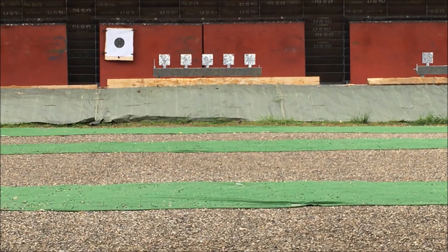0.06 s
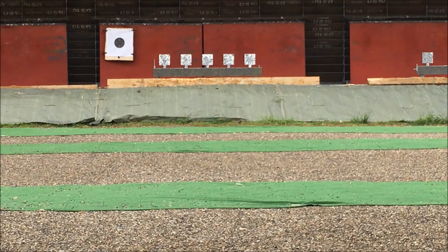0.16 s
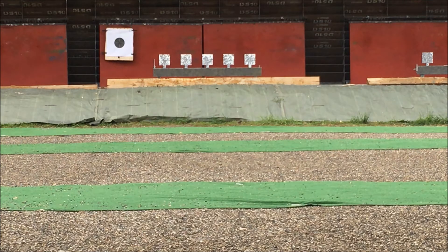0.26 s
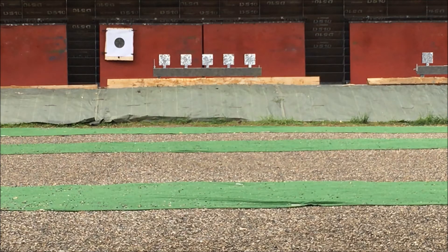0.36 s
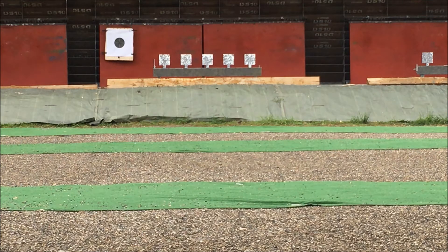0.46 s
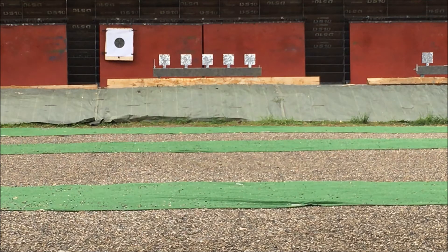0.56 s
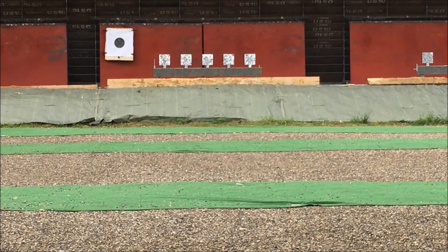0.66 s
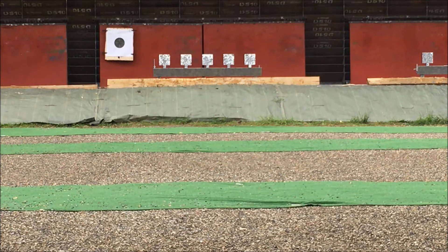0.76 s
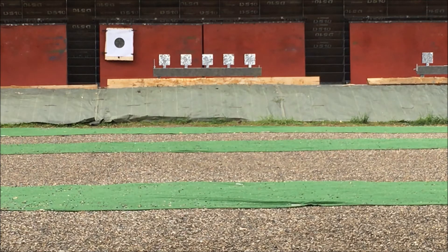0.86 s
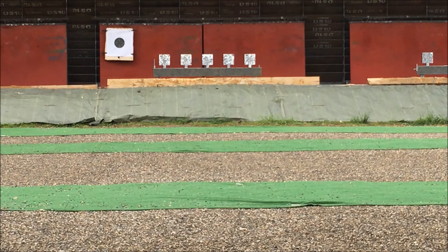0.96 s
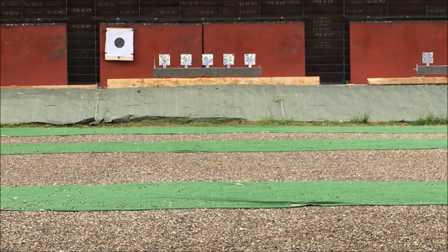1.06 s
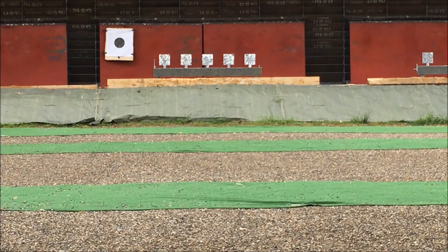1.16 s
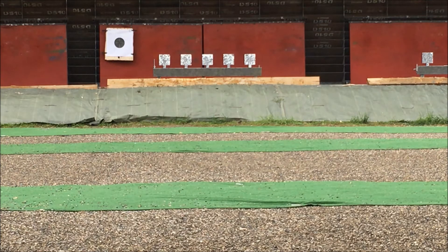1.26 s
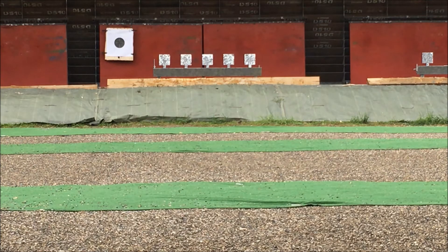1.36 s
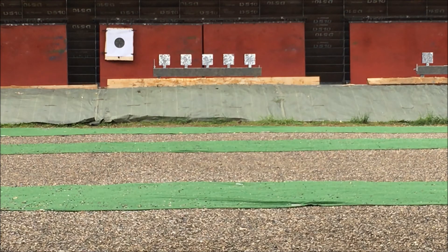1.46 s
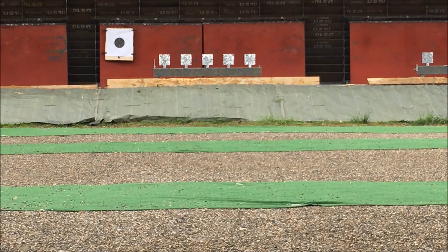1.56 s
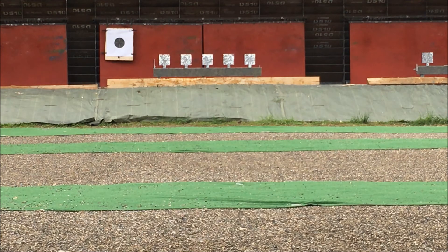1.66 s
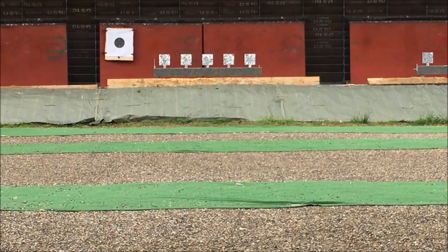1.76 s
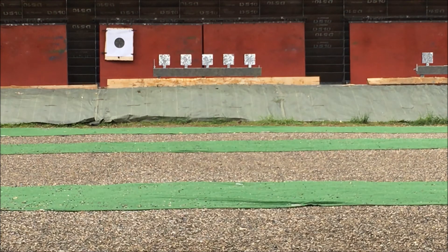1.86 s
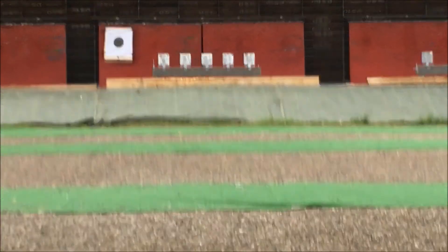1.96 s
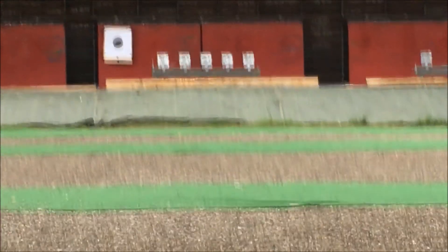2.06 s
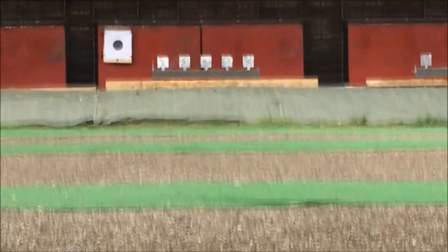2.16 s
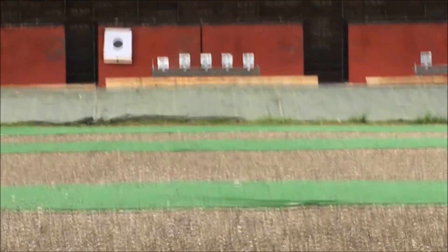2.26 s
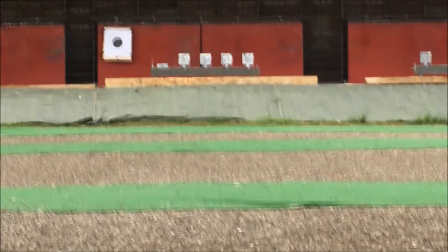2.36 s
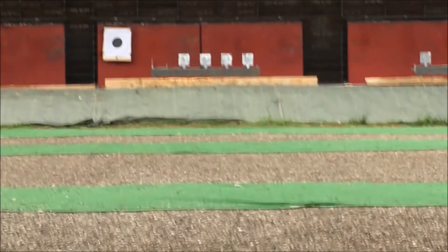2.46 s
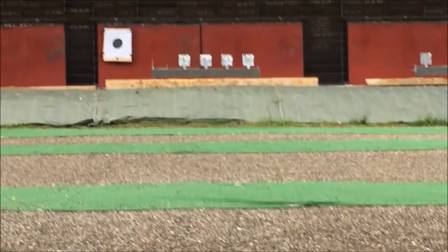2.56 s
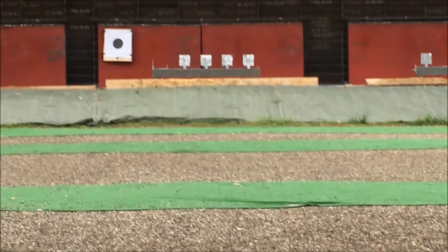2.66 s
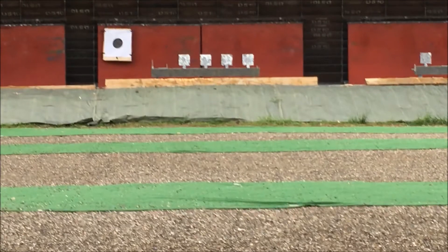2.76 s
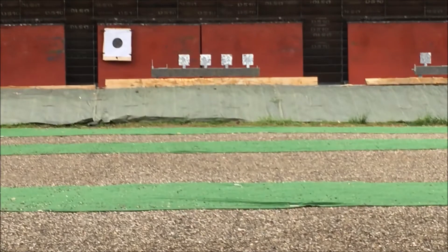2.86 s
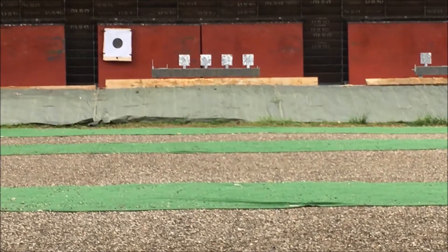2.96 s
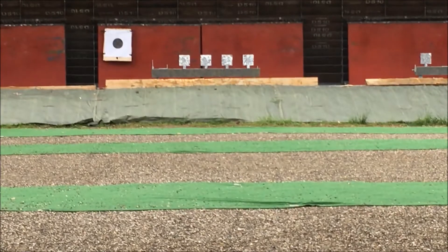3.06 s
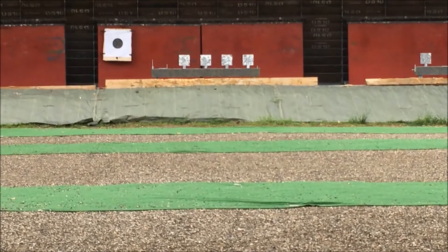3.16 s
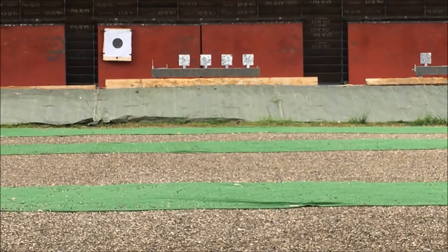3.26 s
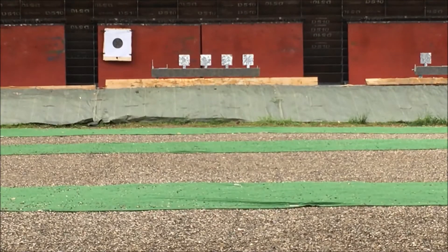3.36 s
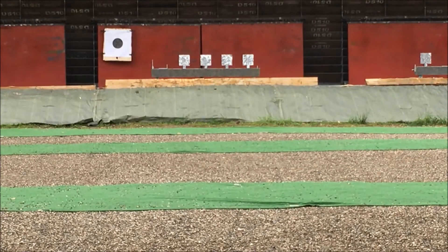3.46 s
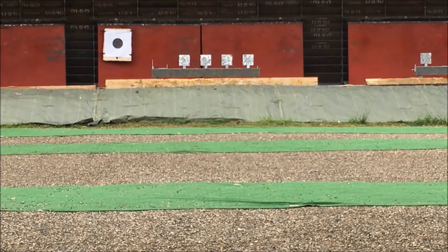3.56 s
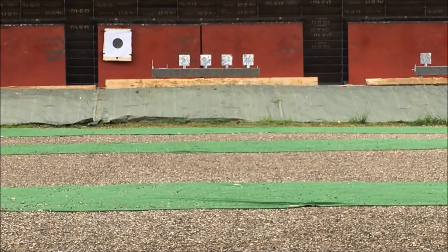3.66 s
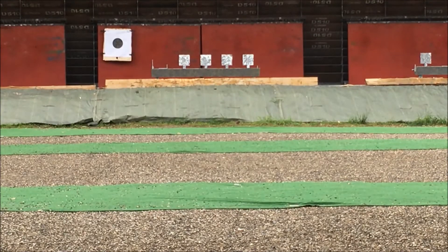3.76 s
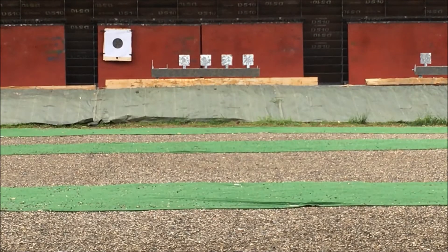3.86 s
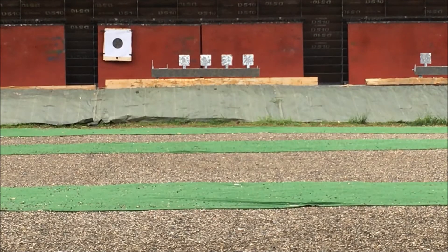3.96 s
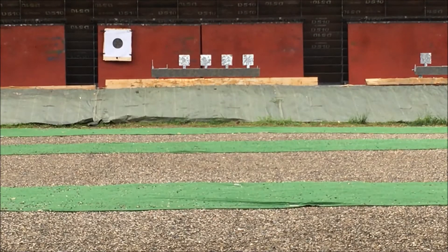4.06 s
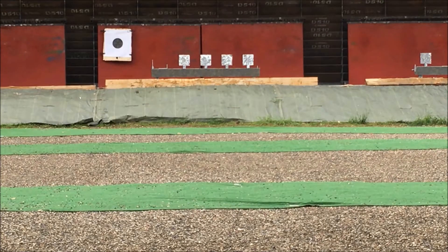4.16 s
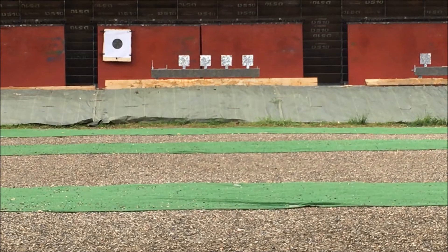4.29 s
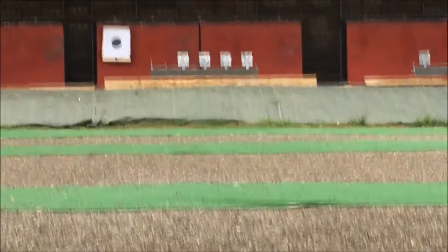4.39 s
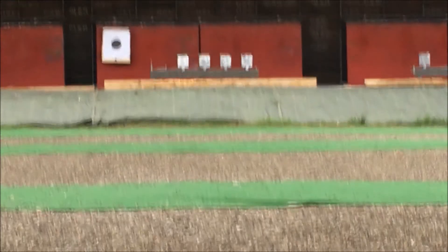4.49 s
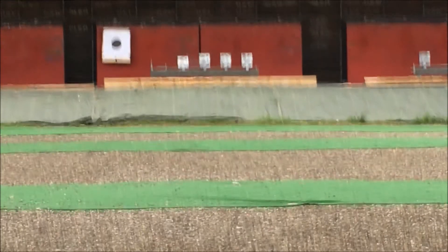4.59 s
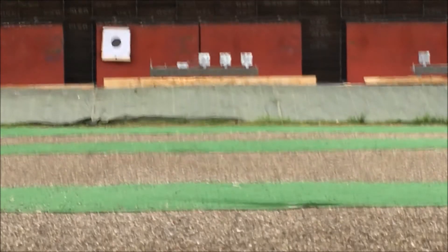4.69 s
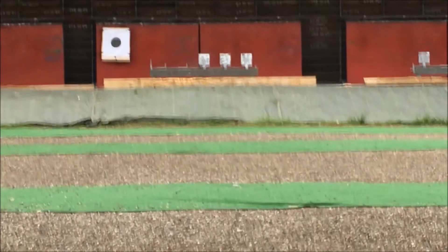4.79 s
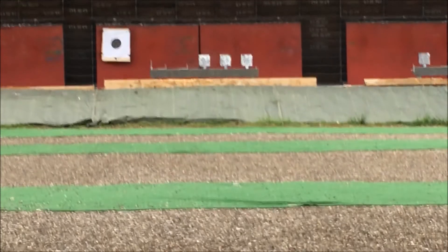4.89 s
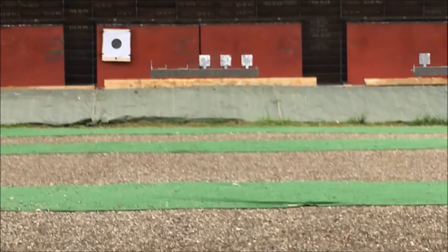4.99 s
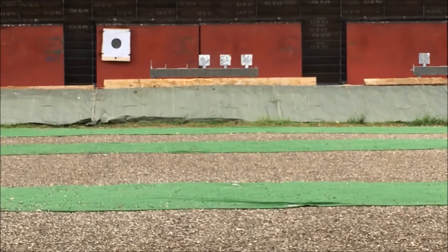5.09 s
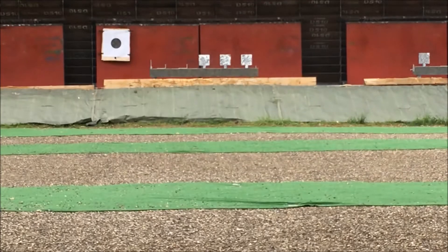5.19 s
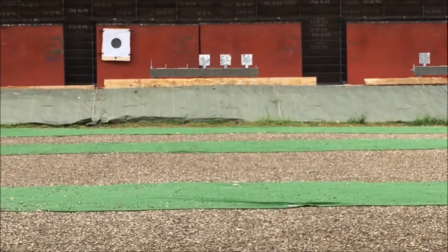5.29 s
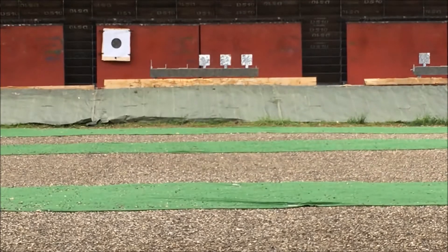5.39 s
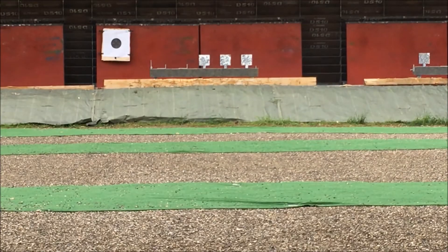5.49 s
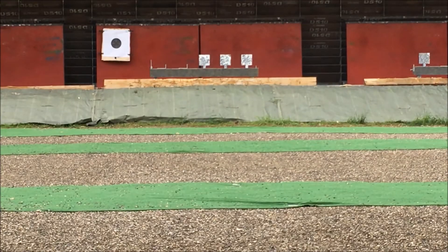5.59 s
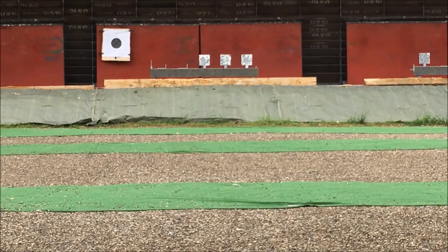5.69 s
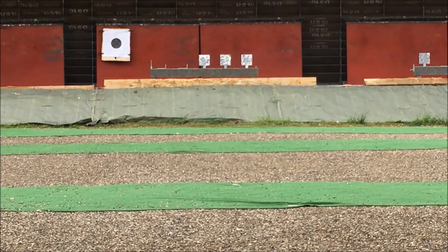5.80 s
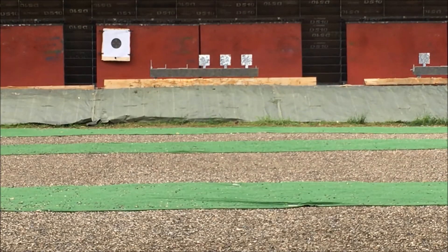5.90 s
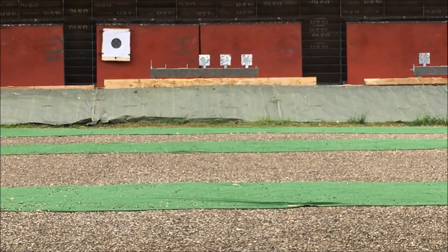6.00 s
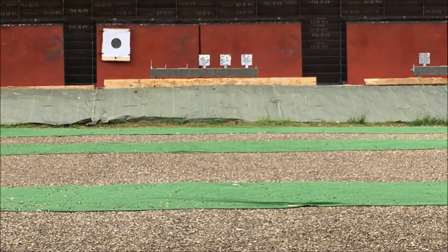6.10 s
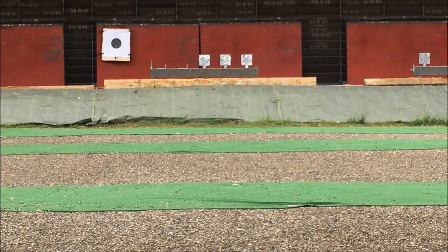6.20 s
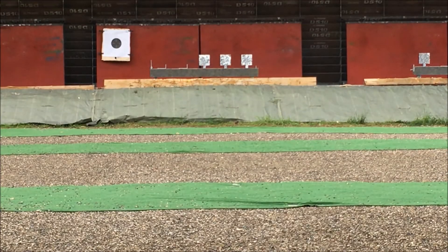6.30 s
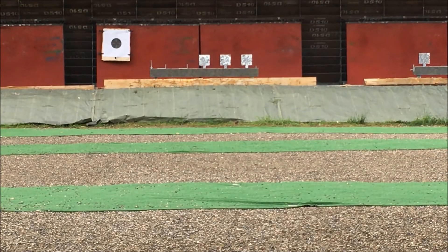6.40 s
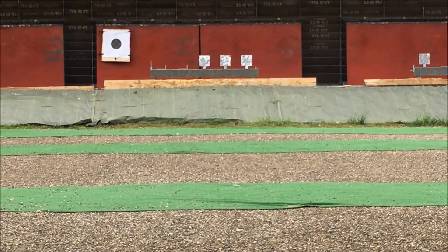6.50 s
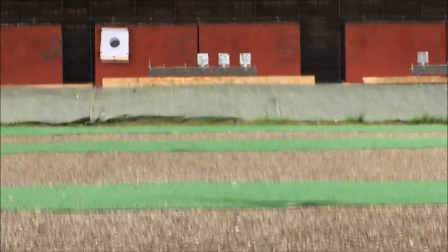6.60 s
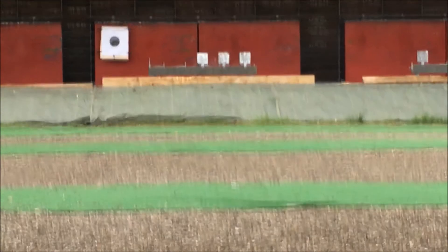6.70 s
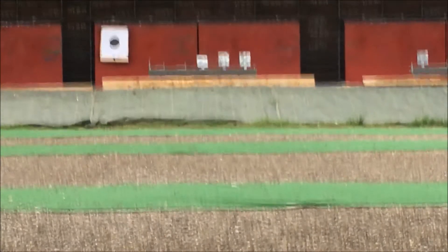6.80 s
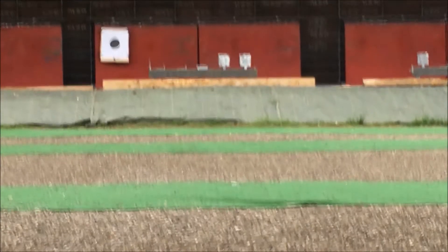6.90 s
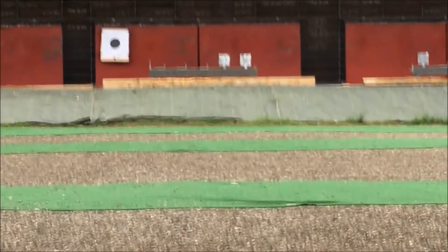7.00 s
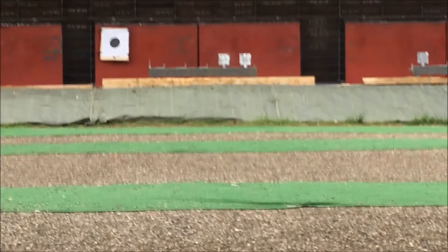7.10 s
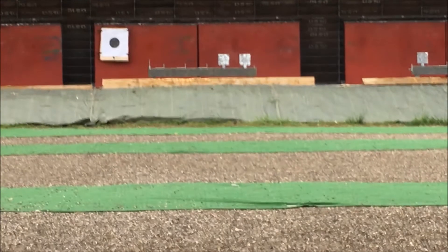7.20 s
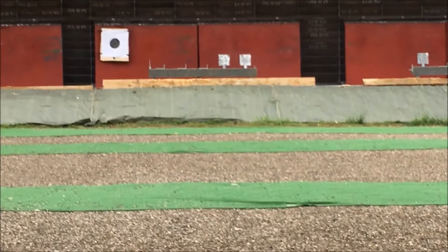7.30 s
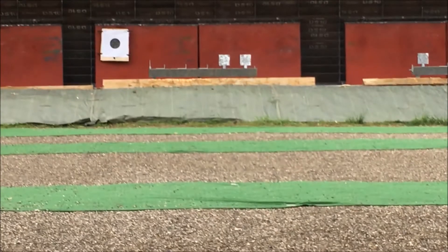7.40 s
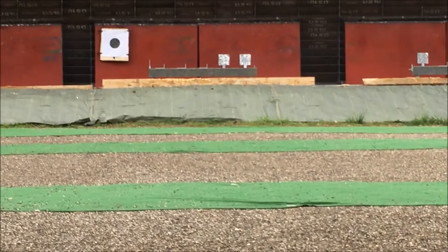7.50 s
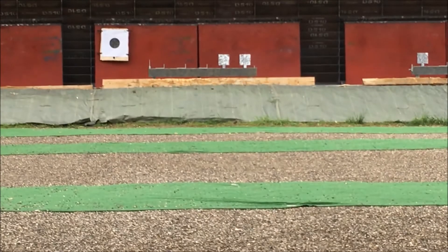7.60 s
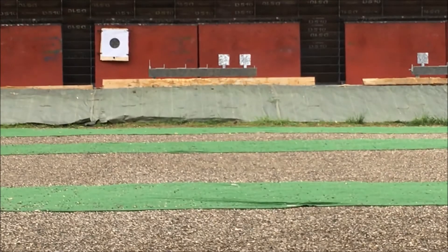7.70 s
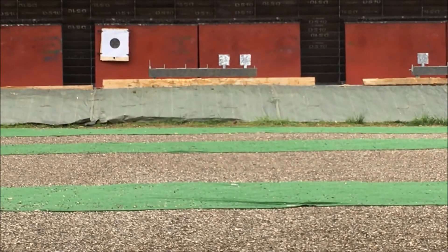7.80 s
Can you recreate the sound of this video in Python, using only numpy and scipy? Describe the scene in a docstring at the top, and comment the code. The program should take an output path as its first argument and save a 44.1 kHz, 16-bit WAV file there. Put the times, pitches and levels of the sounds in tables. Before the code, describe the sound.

Sharp pistol shots roll around an outdoor range, three followed by a steel plate ringing and falling, with weaker shots from the next lane.

```python
"""Pistol shots at steel plates

A pistol fires three times on a walled outdoor range; the next lane fires twice. Each bang rolls between
the walls, and the struck plate rings and drops with a rattle. Spent brass cases tinkle and small things
click nearby. A mono phone microphone turns itself down at loud shots, then lets far traffic creep back."""
import sys
import numpy as np
from scipy import signal
from scipy.fft import rfft, irfft
from scipy.io import wavfile
from scipy.ndimage import uniform_filter1d, minimum_filter1d

SR = 44100
rng = np.random.default_rng(int(sys.argv[2]) if len(sys.argv) > 2 else 0)


def store_pcm(level_fs):
    """Save levels as 16-bit WAV."""
    pcm = np.round(np.clip(level_fs, -1, 1) * 32767).astype(np.int16)
    wavfile.write(sys.argv[1], SR, np.atleast_2d(pcm).T)


N = 346185
SPAN = 98304  # samples in one sound event
T = np.arange(SPAN) / SR  # seconds since the event began

# the three near shots: t/s, level/dB, phone's smear/dB, long roll/dB, plate ring/dB,
# plate brightness/(dB per octave), case pitch/Hz
SHOTS = [(2.1218, 2, 8.5, 17, 1, 7, 10580), (4.4737, -0.5, -4, 18.5, -2, 0.5, 10560),
         (6.696, -2, 0.5, 20.5, 0.5, 4.5, 10400)]
# the tones a steel plate rings at: f/Hz, level/dB
PLATE_TONES = [(2519, -48), (3564, -56), (4344, -38), (5356, -54), (5588, -60), (6142, -64), (7079, -51),
               (7940, -61), (8070, -60), (8807, -58), (9437, -68), (11111, -60), (11402, -70), (11859, -71),
               (11892, -69), (13076, -70), (13124, -69), (13351, -71), (13781, -72), (14605, -72)]
# spectra (strength at each pitch) of a sharp crack, a bright rattle and a tiny tick: f/Hz, level/dB
CRACK_SPECTRUM = [(25, -29), (100, -2.5), (300, 5), (1100, 3), (2000, -6.5), (4000, -5.5), (7000, -13.5),
                  (11000, -19.5), (16000, -20)]
RATTLE_SPECTRUM = [(500, -12), (2500, 9.5), (5500, 9), (9000, 3), (13000, -9.5), (16000, -14)]
TICK_SPECTRUM = [(1000, -11), (3000, -14.5), (4800, -7), (8000, -8), (13000, -9), (16000, -10)]


def pistol():
    """Each shot is a sharp crack, followed by near echoes, a boom and a long roll between the walls."""
    # spectra of the phone's smear and of the parts of a shot: f/Hz, level/dB
    smear_spectrum = [(30, -53.5), (100, -30), (250, -7.5), (550, 0.5), (1100, -5.5), (1700, -18),
                      (2900, -15), (3800, -42.5), (16000, -47.5)]
    echo_spectrum = [(25, -32), (70, -17), (130, -3), (300, 0), (650, 0), (1100, -3.5), (1700, -12.5),
                     (2700, -20), (4000, -16), (6500, -16.5), (10000, -21), (16000, -28.5)]
    boom_spectrum = [(22, -25), (44, 4), (70, 1), (110, -6), (200, -30), (600, -71.5), (2000, -110)]
    roll_spectrum = [(30, -36), (90, -26.5), (170, -9), (330, 0.5), (700, 3), (1200, 0), (1900, -10),
                     (2900, -18), (4000, -17), (6500, -25), (10000, -41.5), (16000, -34.5)]
    far_spectrum = [(40, -37), (130, -10.5), (290, -2), (600, -11.5), (1100, -17.5), (2500, -17),
                    (4800, -19.5), (7500, -27), (16000, -49.5)]
    # how long the near echoes and the far roll last: f/Hz, time to fade by 60 dB/s
    echo_decay = [(50, 0.47), (400, 0.4), (2500, 0.22), (7000, 0.56), (16000, 0.15)]
    far_decay = [(300, 4.2), (1200, 3.92), (4500, 2.9), (12000, 0.93)]
    out = np.zeros(N)
    for start, level_db, smear_db, roll_db, *_ in SHOTS:
        # the phone's processing smears the start of each shot into a tick and a dull swell
        smear_tick = undb(-21.5) * noise(CRACK_SPECTRUM) * fall(0.097)
        smear_swell = undb(smear_db - 2) * noise(smear_spectrum) * bulge(0.021, 0.0091)
        add(out, start - 0.0225, smear_tick + smear_swell)
        crack = undb(21) * noise(CRACK_SPECTRUM) * fall(0.035, hold=0.004)
        # roof, floor and walls keep the blast strong for nearly a tenth of a second
        echoes = noise(echo_spectrum) * flicker(rate=460, depth_db=2.5)
        echoes = undb(19.5) * fade(echoes, echo_decay, hold=0.084) * rise(0.011)
        # the muzzle's boom arrives late, and the backstop behind the targets returns it once more
        boom_shape = bulge(0.06, 0.042) + undb(-1.5) * bulge(0.15, 0.0084)
        boom = undb(12.5) * noise(boom_spectrum) * boom_shape
        roll = undb(roll_db) * wall_roll(roll_spectrum, build_s=0.11)
        # a faint roll comes back from the land around the range
        far = noise(far_spectrum) * flicker(rate=21, depth_db=0)
        far = undb(-18.5) * fade(far, far_decay) * rise(0.19)
        add(out, start, undb(level_db) * (late_bass(crack + echoes + roll) + boom + far))
    return out


def wall_roll(spectrum, build_s):
    """The long roll of the range builds up as echoes multiply between the walls."""
    # how long the roll lasts: f/Hz, time to fade by 60 dB/s
    roll_decay = [(80, 1.53), (280, 1.094), (900, 0.97), (2500, 1.22), (5000, 1.19), (9000, 0.98),
                  (15000, 0.53)]
    echoes = noise(spectrum) * flicker(rate=74, depth_db=1.46)
    return fade(echoes, roll_decay) * rise(build_s)


def late_bass(x, below_hz=155, lag_s=0.064):
    """Hold back the bass of a shot until the walls have built it up."""
    hz = np.arange(SPAN // 2 + 1) * SR / SPAN
    bass = irfft(rfft(x) / (1 + (hz / below_hz) ** 8))
    return x - bass * bulge(0, lag_s)


def plates():
    """A bullet smacks a steel plate, which rings, then drops and bangs on its stop."""
    # rattles of the falling plates: t/s, rattle/dB, time at full strength/s, ring/dB
    drops = [(2.654, -19, 0.022, -42), (2.858, -24.5, 0.021, -39), (3.061, -40.5, .05, -61),
             (4.981, -22, 0.055, -30.5), (7.16, -21.5, 0.1, -29.5)]
    delay_s = 0.14  # the bullet flies out and the sound travels back
    build_s = 0.011  # the ring grows as the walls return it
    stop_hz = 5400  # the main tone of a plate hitting its stop
    main_hz, _ = max(PLATE_TONES, key=lambda tone: tone[1])
    out = np.zeros(N)
    for start, _, _, _, ring_db, bright_db, _ in SHOTS:
        smack = undb(10) * noise(CRACK_SPECTRUM) * bulge(0.014, 0.011)
        ring = undb(2.5) * plate_ring(t60=0.84, treble_damping=0.77, bright_db=bright_db)
        # the strongest tone sings on faintly
        linger = undb(-29) * sine(main_hz) * flicker(rate=25, depth_db=2) * fall(2.7)
        soft_tail = undb(-17) * plate_ring(t60=1.48, treble_damping=0.39, bright_db=bright_db)
        ringing = (ring + soft_tail) * rise(build_s) + linger
        add(out, start + delay_s, smack + undb(ring_db) * ringing)
    jangle = plate_ring(t60=1, treble_damping=0.5, bright_db=3)
    for start, rattle_db, hold, ring_db in drops:
        rattle = noise(RATTLE_SPECTRUM) * flicker(rate=450, depth_db=1.5) * fall(0.54, hold)
        bang = undb(2) * sine(stop_hz) * flicker(rate=40, depth_db=1.5) * fall(0.66, hold)
        drop = undb(rattle_db) * rattle + undb(ring_db) * (jangle + bang)
        add(out, start, drop * rise(0.015))
    return out


def plate_ring(t60, treble_damping, bright_db):
    """Each plate tone is a cluster of close pitches that throb together; high tones die sooner."""
    # how strongly a bullet sets each pitch ringing: f/Hz, level/dB
    strike = [(2500, -5), (4300, 0), (5400, 0), (7100, 4.5), (9000, 7.5), (11000, 5), (15000, 7)]
    main_hz, main_db = max(PLATE_TONES, key=lambda tone: tone[1])
    offset_hz, strength = np.transpose([(0, 1), (-38, 0.65), (-27, 0.45), (-13, 0.55), (15, 0.35)])
    ring = np.zeros(SPAN)
    for hz, db in PLATE_TONES:
        pitches = hz + offset_hz + rng.uniform(-4, 4, len(strength))
        phases = np.exp(2j * np.pi * rng.random(len(strength)))
        spectrum = np.zeros(SPAN // 2 + 1, complex)
        spectrum[np.round(pitches * SPAN / SR).astype(int)] = strength * phases
        cluster = irfft(spectrum)
        octaves_up = max(np.log2(hz / main_hz), 0)
        spot_db = 2 * rng.standard_normal()  # each hit lands on another spot
        tone_db = db - main_db + lookup(strike, hz) + bright_db * octaves_up + spot_db
        decay = fall(t60 * 2 ** (-treble_damping * octaves_up))
        ring += undb(tone_db) * cluster / cluster.std() * decay
    return ring


def next_lane():
    """Shots from behind a screen: a thin crack, dull wall echoes, a bullet's splash and the roll."""
    # the neighbour's shots: t/s, crack/dB, wall echoes/dB, roll/dB
    lane_shots = [(1.927, -22, -15, -19), (5.8616, -14.5, -15, -10.5)]
    # echoes off the lane walls: delay/s, level/dB
    wall_echoes = [(.01, -5), (.0175, 2), (.035, 1), (.041, -5), (.0705, 0), (.097, -8)]
    # spectra of one echo and of the roll: f/Hz, level/dB
    echo_spectrum = [(60, -26), (200, 8.5), (700, 7), (1500, 8.5), (2400, -3.5), (4000, -36), (8000, -47),
                     (16000, -42)]
    roll_spectrum = [(25, -16.5), (80, -0.5), (150, 1), (280, 5), (700, 4), (1200, 0.5), (2000, -6.5),
                     (3000, -14.5), (5000, -20), (9000, -33), (16000, -48)]
    # rough walls blunt the front of an echo and smear its end
    echo_shape = fall(0.021, hold=0.0026) * rise(0.00021)
    out = np.zeros(N)
    for start, crack_db, walls_db, roll_db in lane_shots:
        shot = undb(crack_db) * noise(CRACK_SPECTRUM) * fall(0.047)
        shot += undb(roll_db) * wall_roll(roll_spectrum, build_s=0.027)
        for delay, echo_db in wall_echoes:
            add(shot, delay, undb(walls_db + echo_db) * noise(echo_spectrum) * echo_shape)
        # the bullet bursts on the backstop a moment later
        splash = noise(RATTLE_SPECTRUM) * flicker(rate=300, depth_db=3) * fall(0.48)
        add(shot, 0.088, undb(roll_db - 20.5) * splash)
        add(out, start, late_bass(shot))
    return out


def spent_cases():
    """Empty brass cases scuff the ground, clink and ring; one knocks on the wooden bench."""
    # each bounce: t/s, scuff/dB, clink/dB, ring/dB
    bounces = [(3.562, -42, -76, -44.5), (3.829, -53.5, -52, -46.5), (4.008, -54, -81, -65),
               (4.112, -56, -56, -72), (4.233, -66, -56.5, -61), (4.373, -68, -72, -58),
               (5.172, -50, -52, -49), (7.71, -55, -62, -58), (7.825, -56, -62, -55)]
    # spectra of the dull clink and the wooden knock: f/Hz, level/dB
    clink_spectrum = [(2000, -31.5), (3800, -8), (4500, -2), (5200, -4.5), (5900, -13), (10000, -38.5)]
    bench_spectrum = [(100, -15), (500, -4), (1100, 0), (1600, 2), (2100, -1.5), (3200, -10), (6000, -22),
                      (15000, -49)]
    out = np.zeros(N)
    for start, scuff_db, clink_db, ring_db in bounces:
        hz = [shot[-1] for shot in SHOTS if shot[0] < start][-1]  # the case of the latest shot
        # echoes under the roof draw the scuff out into a hiss
        scuff = noise(TICK_SPECTRUM) * flicker(rate=250, depth_db=2.5) * fall(0.45) * rise(0.008)
        clink = noise(clink_spectrum) * fall(0.55) * rise(0.008)
        # the slightly oval case mouth splits its tone into a throbbing pair
        ring = sine(hz) + 0.5 * sine(hz + rng.uniform(7.1, 60))
        ring *= flicker(rate=90, depth_db=3) * fall(0.5, hold=0.04)
        add(out, start, undb(scuff_db) * scuff + undb(clink_db) * clink + undb(ring_db) * ring)
    knock = noise(bench_spectrum) * (fall(0.03) + undb(-15) * fall(0.29))
    add(out, 5.171, undb(-5) * knock)
    return out


def clicks_and_rustles():
    """Small dry sounds close to the microphone, too weak to raise an echo."""
    # starts of the clicks and peaks of the rustles: t/s, level/dB
    clicks = [(5.797, -49), (5.813, -39.5), (6.411, -58), (6.423, -63), (7.566, -52)]
    rustles = [(.14, -69), (.64, -73), (1.08, -71.5)]
    out = np.zeros(N)
    for start, db in clicks:
        add(out, start, undb(db) * noise(TICK_SPECTRUM) * fall(0.026))
    t = np.arange(N) / SR
    rustling = sum(undb(db) * bulge(peak_s, 0.066, t) for peak_s, db in rustles)
    return out + rustling * noise(RATTLE_SPECTRUM, size=N)


def background():
    """Distant traffic and moving air rumble unsteadily, with one soft, low swell."""
    # spectra of the rumble and the swell: f/Hz, level/dB
    rumble_spectrum = [(15, -43), (25, -11.5), (72, -1.5), (141, -13.5), (166, -17), (242, -15.5),
                       (285, -20.5), (326, -18), (463, -27), (1020, -17), (2410, -31.5), (2990, -41),
                       (5140, -49.5), (14800, -57), (16000, -62.5)]
    swell_spectrum = [(50, -14.5), (120, -2.5), (220, 0.5), (380, -7), (520, -23), (2000, -58)]
    waver = flicker(rate=6, depth_db=0.5, size=N)
    rumble = undb(-46.5) * noise(rumble_spectrum, size=N) * waver
    swell = undb(-49.5) * noise(swell_spectrum, size=N) * bulge(1.77, 0.17, np.arange(N) / SR)
    return rumble + swell


def undb(db):
    """Turn decibels into a number to multiply by."""
    return 10 ** (np.asarray(db) / 20)


def lookup(table, hz):
    """Read between a table's (f/Hz, value) points, with octaves evenly spaced."""
    f, value = np.transpose(table)
    return np.interp(np.log(np.maximum(hz, 1)), np.log(f), value)


def add(track, start, sound):
    """Mix a sound into the track at start seconds, easing out its last half second."""
    i = int(start * SR)
    ease_out = np.minimum(2 * (T[-1] - T), 1)
    track[i:i + len(sound)] += (sound * ease_out)[:len(track) - i]


def sine(hz):
    """A pure tone."""
    return np.sin(2 * np.pi * hz * T)


def rise(build_s):
    """A level that climbs from 0 towards 1."""
    return 1 - np.exp(-T / build_s)


def fall(t60, hold=0):
    """A level that stays at 1 for hold seconds, then drops 60 dB every t60 seconds."""
    return np.exp(-np.log(1000) * np.maximum(T - hold, 0) / t60)


def bulge(peak_s, width_s, t=T):
    """A level that swells and ebbs smoothly around one moment."""
    return np.exp(-((t - peak_s) / width_s) ** 2)


def noise(spectrum, size=SPAN):
    """Noise with the given spectrum and an average power of 1."""
    hz = np.arange(size // 2 + 1) * SR / size
    x = irfft(rfft(rng.standard_normal(size)) * undb(lookup(spectrum, hz)), size)
    return x / x.std()


def flicker(rate, depth_db, size=SPAN):
    """A level that wanders at random, rate times a second, with an average power of 1."""
    wander = np.interp(np.arange(size) * rate / SR, np.arange(size), rng.standard_normal(size))
    gain = undb(depth_db * wander)
    return gain / np.sqrt(np.mean(gain ** 2))


def fade(x, decay_table, hold=0):
    """Let each octave of x die away at its own pace."""
    centres = np.geomspace(32, 16384, 10)
    hz = np.arange(SPAN // 2 + 1) * SR / SPAN
    octave = np.interp(np.log(hz + 1), np.log(centres), np.arange(len(centres)))
    spectrum = rfft(x)
    out = np.zeros(SPAN)
    for k, centre in enumerate(centres):
        band = irfft(spectrum * np.maximum(1 - abs(octave - k), 0))
        out += band * fall(lookup(decay_table, centre), hold)
    return out


def scene():
    """All sources reach one microphone, heard alike in both channels."""
    mono = pistol() + plates() + next_lane() + spent_cases() + clicks_and_rustles() + background()
    return np.tile(mono, (2, 1))


def release(cut_db, db_per_s):
    """Let a cut in volume recover no faster than the given pace."""
    ramp = db_per_s * np.arange(N) / SR
    return np.maximum.accumulate(cut_db + ramp) - ramp


def auto_volume(x, limit_db, hold_s, slow_share, slow_db_per_s):
    """Loud peaks turn the volume down and hold it; part returns quickly, the rest creeps back."""
    power = uniform_filter1d(x[0] ** 2, size=220)
    excess_db = np.maximum(10 * np.log10(np.maximum(power, 1e-12)) - limit_db, 0)
    half = int(hold_s * SR / 2)
    held_db = -minimum_filter1d(-excess_db, 2 * half + 1, origin=half)  # the largest recent excess
    cut_db = np.maximum(release(held_db, db_per_s=123), release(slow_share * excess_db, slow_db_per_s))
    return x * undb(-uniform_filter1d(cut_db, size=45))


def record(dry):
    """The phone turns loud moments down, clips what is still too big and cuts the highest treble."""
    x = auto_volume(dry, limit_db=-8.5, hold_s=0.12, slow_share=0.66, slow_db_per_s=8.5)
    treble_cut = signal.ellip(10, 0.2, 80, 15900, fs=SR, output="sos")
    return signal.sosfilt(treble_cut, np.clip(x, -1, 1))


dry = scene()
out = record(dry)
store_pcm(out)
```